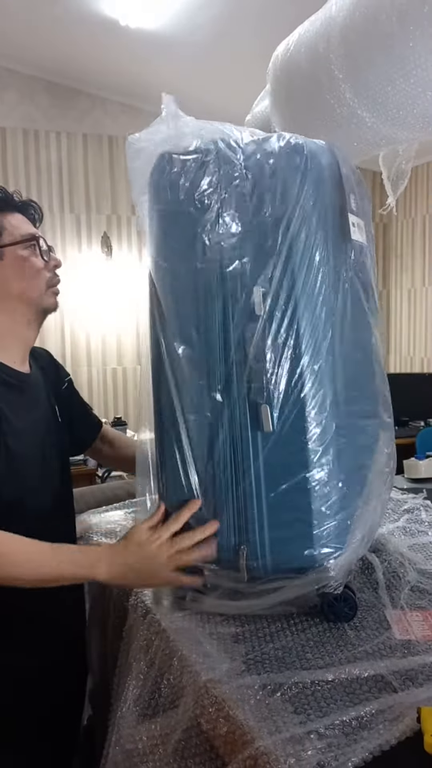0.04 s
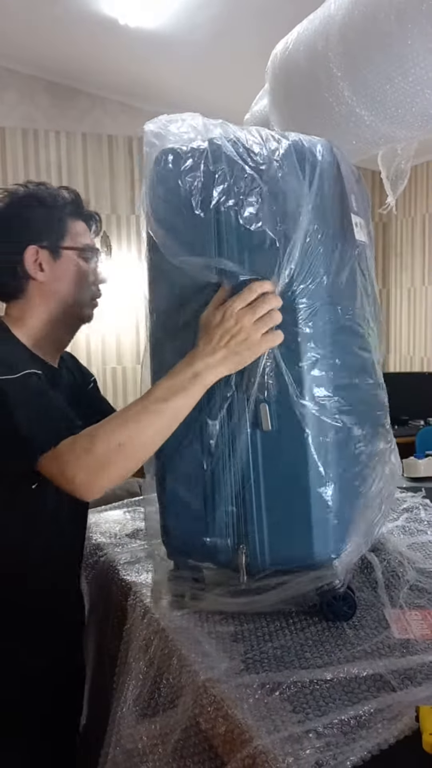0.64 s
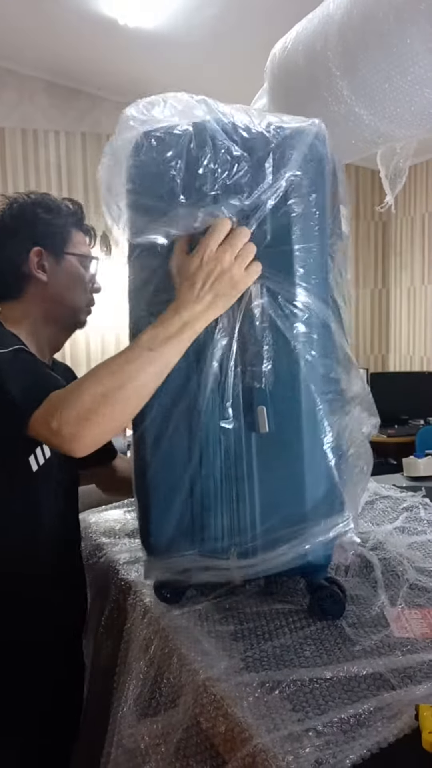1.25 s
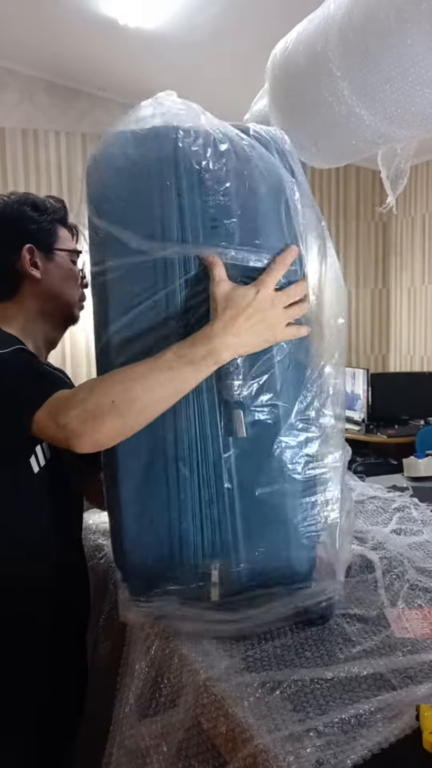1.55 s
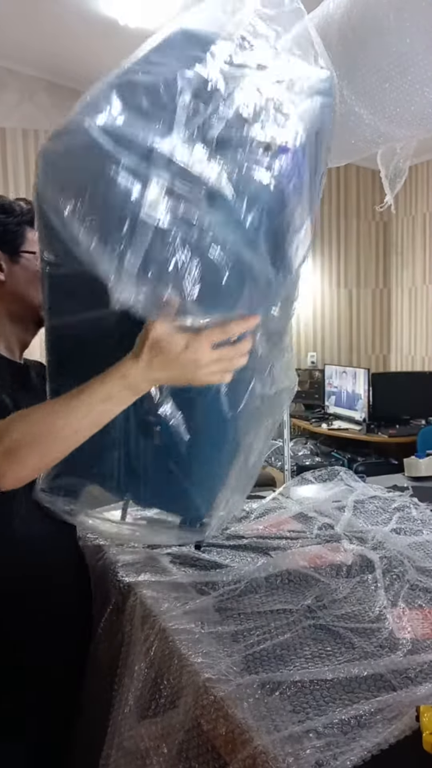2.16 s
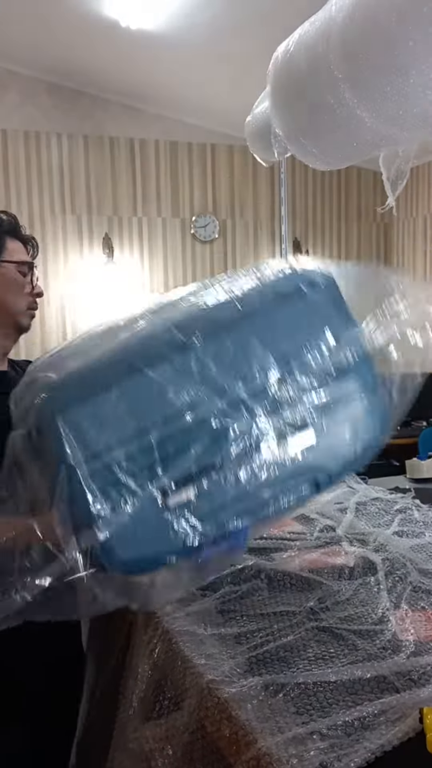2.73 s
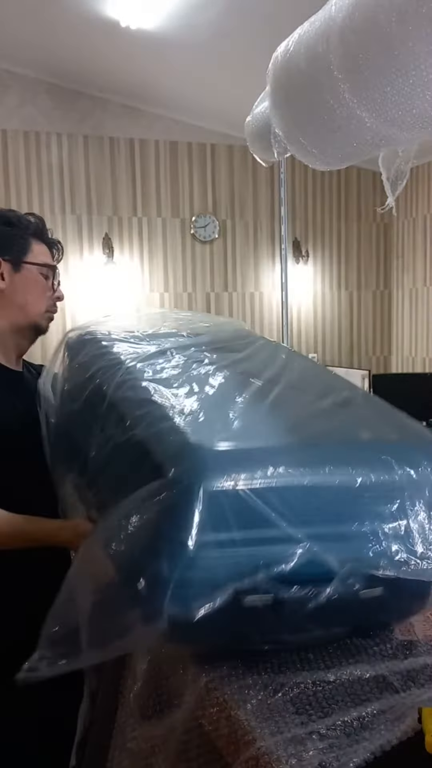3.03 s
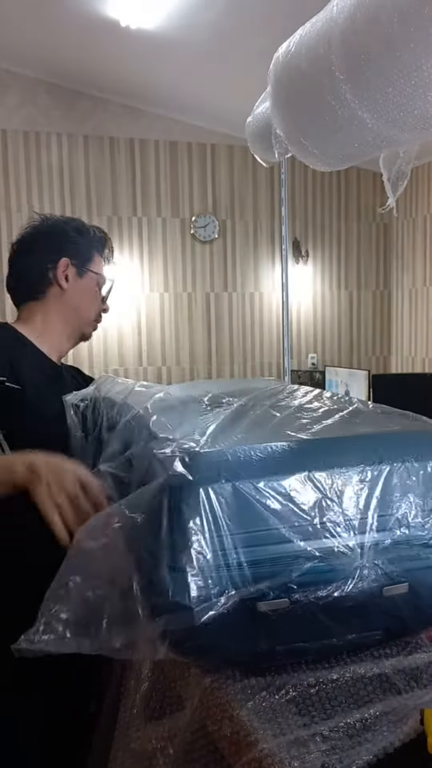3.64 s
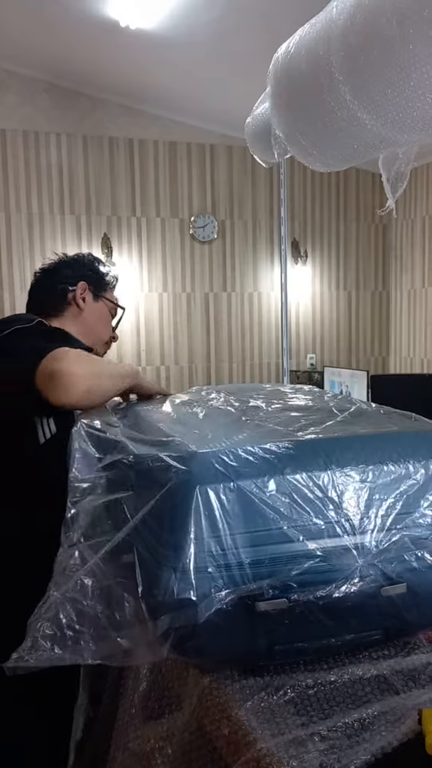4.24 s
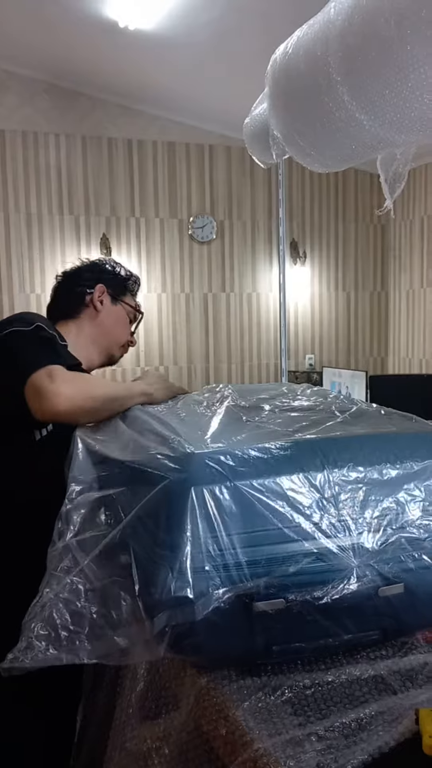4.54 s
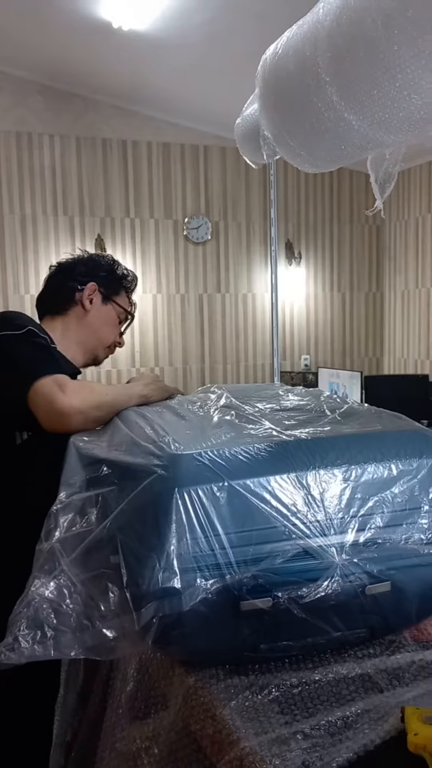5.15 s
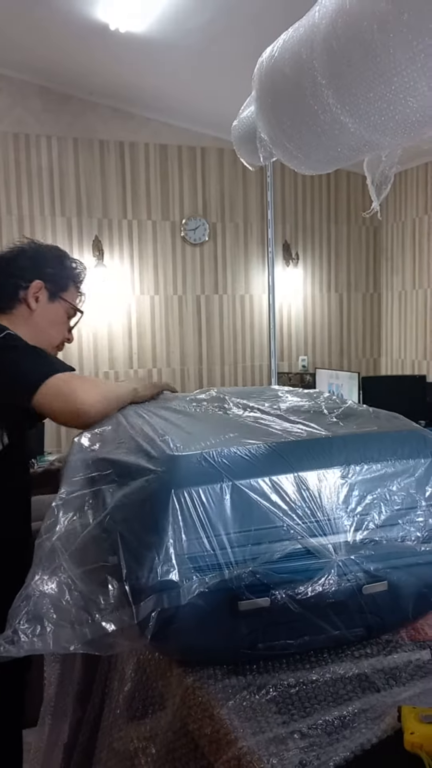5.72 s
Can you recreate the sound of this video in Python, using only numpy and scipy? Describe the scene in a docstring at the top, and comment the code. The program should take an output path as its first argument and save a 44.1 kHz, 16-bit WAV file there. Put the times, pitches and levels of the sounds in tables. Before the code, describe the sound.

From the start, thin plastic film crinkles and rubs over a hard suitcase in short pulls, with light hollow knocks and a faint rumble from the shell. At about 1.3 to 1.5 seconds comes a quick cluster of loud, sharp clacks and knocks from the case and its fittings. Softer rustling continues, with small bumps near 2.1 and 2.7 seconds. At 3 seconds the case lands on a table with a low, hollow boom, then knocks and clacks loudly several times until 3.6 seconds as the crinkling swells again. The film rustles quietly after 4 seconds, with a scuff and knock around 4.8. From about 5.1 to 5.7 seconds a short zip-like buzz rises in pitch and falls, ending with a light knock, a rustle and a small click. Everything sounds close, in a small, quiet room with a short reverberation.

```python
"""Bagged suitcase laid on a table

A hard suitcase in a loose plastic bag is gripped, lifted and laid on its side in a small room.
Each pull crinkles the film and drags it over the hollow shell, which knocks and booms; fittings clack.
At the end a zip-like slider ticks over teeth in a short buzz that rises, then falls."""
import sys
import numpy as np
from scipy import signal
from scipy.fft import rfft, irfft
from scipy.io import wavfile
from scipy.ndimage import uniform_filter1d

SR = 44100
rng = np.random.default_rng(int(sys.argv[2]) if len(sys.argv) > 2 else 0)


def put_to_file(sound):
    """Save the sound as 16-bit audio at rate SR, in the file named by the first command-line argument."""
    columns = np.atleast_2d(sound).T  # one column per channel
    safe = np.clip(columns, -1, 1)
    whole_steps = np.round(safe * 32767)
    wavfile.write(sys.argv[1], SR, whole_steps.astype(np.int16))


N = 255185
TIME_S = np.arange(N) / SR
BINS_HZ = abs(np.fft.fftfreq(4096, 1 / SR))
PORT_GAP_S = 0.000476  # sound travel between the microphone's two ports


def amp(db):
    """Decibels to gain."""
    return 10 ** (np.asarray(db) / 20)


def unit(x):
    """Scale to rms 1."""
    return x / np.sqrt(np.mean(x ** 2) + 1e-20)


def spectrum(points, hz=BINS_HZ):
    """Interpolate a table over log frequency."""
    point_hz, value = np.transpose(points)
    return np.interp(np.log(hz + 1), np.log(point_hz), value)


def curves(rows):
    """Interpolate a table over time, per column and sample."""
    time_s, *columns = np.transpose(rows)
    return [np.interp(TIME_S, time_s, column) for column in columns]


def wander(hz):
    """Random drift up to hz, rms 1."""
    return unit(signal.sosfilt(signal.butter(2, hz, fs=SR, output="sos"), rng.standard_normal(N)))


def add(mix, start_s, sound):
    """Mix a sound in at start_s."""
    part = mix[max(round(start_s * SR), 0):][:len(sound)]
    part += sound[:len(part)]


def convolve(x, response):
    """Convolve along time, keeping the length."""
    return signal.fftconvolve(np.atleast_2d(x), np.atleast_2d(response), axes=1)[:, :x.shape[-1]]


def causal(db):
    """Minimum-phase response shaped by db over BINS_HZ, energy 1."""
    log_gain = np.conj(signal.hilbert(np.log(amp(db))))
    response = np.fft.ifft(np.exp(log_gain)).real[:len(BINS_HZ) // 2]
    return response / np.linalg.norm(response)


def diffuse(pair, bass_coherence=0.92):
    """Sound from all sides: alike at both ports in the bass, unrelated in the treble."""
    coherence = bass_coherence * np.sinc(2 * np.fft.rfftfreq(pair.shape[1], 1 / SR) * PORT_GAP_S)
    mid, side = rfft(pair) * np.sqrt([(1 + coherence) / 2, (1 - coherence) / 2])
    return irfft([mid + side, mid - side], pair.shape[1])


def direct(x, lag_s):
    """A near source reaches the right port first; table and case echo it."""
    # (delay [s], level [dB])
    echoes = [(.0033, -24), (0.0131, -12.5)]
    hz = np.fft.rfftfreq(N, 1 / SR)
    paths = 1 + sum(amp(db - 6 / (1 + hz / 500)) * np.exp(-2j * np.pi * hz * s) for s, db in echoes)
    port_lag = np.array([np.exp(-2j * np.pi * hz * lag_s), np.ones(len(hz))])
    return irfft(rfft(x) * paths * port_lag, N)


def room(x, build_s=0.0053):
    """A diffuse tail builds quickly and dies band by band."""
    # (frequency [Hz], T60 [s])
    reverb_times = [(100, 0.11), (400, 0.39), (1000, 0.33), (3000, 0.42), (6000, 0.4), (10000, 0.37),
                    (16000, 0.26)]
    hz, t, bands = signal.stft(rng.standard_normal((2, SR // 2)), SR, nperseg=256)
    decay = amp(-60 * t / spectrum(reverb_times, hz)[:, None])
    tail = signal.istft(bands * decay, SR, nperseg=256)[1]
    build = 1 - np.exp(-(np.arange(tail.shape[1]) / SR / build_s) ** 2)
    tail = diffuse(tail) * build
    return convolve(x, tail / np.linalg.norm(tail[0]))


def pull_levels(swell_db=9):
    """Each pull swells, holds and settles: crinkle, rubbing and rumble levels in dB."""
    # (start [s], rise [s], hold [s], crinkle [dB], rubbing [dB], rumble [dB])
    pulls = [(-.02, 0.017, 0.11, -41, -40.5, -60), (0.093, 0.029, 0.054, -39, -37, -40.5),
             (0.482, 0.019, 0.069, -42, -41.5, -56), (0.588, 0.024, 0.082, -48, -57, -47.5),
             (0.766, 0.042, 0.1, -46.5, -43, -50.5), (0.976, 0.057, 0.077, -41, -35, -49),
             (1.183, 0.036, 0.12, -55, -62, -62), (1.311, 0.064, 0.19, -44, -39, -42),
             (1.623, 0.035, 0.11, -54, -54, -55.5), (1.815, 0.09, 0.1, -54, -49.5, -63),
             (2.022, 0.032, 0.24, -60, -50.5, -57.5), (2.27, 0.087, 0.77, -56.5, -56.5, -67),
             (2.607, 0.022, .07, -60, -51.5, -77), (2.841, 0.16, 0.01, -48, -45.5, -56),
             (3.145, 0.029, 0.34, -46.5, -39.5, -44.5), (3.533, 0.04, 0.074, -41.5, -37, -52),
             (3.738, 0.027, 0.005, -41, -43, -58), (4.019, 0.012, 0.13, -52.5, -61, -73),
             (4.268, 0.073, 0.35, -61, -56.5, -64.5), (4.443, 0.041, 0.039, -61.5, -53, -68),
             (4.784, 0.028, 0.076, -54.5, -39, -74), (4.846, 0.013, 0.017, -50, -55, -76),
             (4.893, 0.028, .12, -62, -78, -58.5), (5.167, 0.047, 0.036, -61, -46.5, -58),
             (5.3, 0.049, 0.29, -60.5, -45, -54), (5.701, 0.039, 0.024, -53, -50, -49.5)]
    # fall after a pull (crinkle [dB/s], rubbing [dB/s], rumble [dB/s])
    settle_db_per_s = (161.5, 182.5, 116)
    t, power = np.arange(0, N / SR + 0.002, 0.001), 0
    for start_s, rise_s, hold_s, *levels_db in pulls:
        held_s = t - start_s - rise_s
        rise_db = swell_db * np.minimum(held_s / rise_s, 0)
        fall_db = np.outer(settle_db_per_s, np.maximum(held_s - hold_s, 0))
        power = power + amp(np.array(levels_db)[:, None] + rise_db - fall_db) ** 2
    return [np.interp(TIME_S, t, 10 * np.log10(p + 1e-12)) for p in power]


def creases(per_s=1300, spread_db=1.5, pitches=24):
    """Tiny buckles of the film tick, each pitch from its own place; most weak, a few sharp."""
    out, t = np.zeros((2, N)), np.arange(160) / SR
    for hz in np.geomspace(900, 15000, pitches):
        size = amp(spread_db * np.minimum(rng.exponential(1, N), 4))
        snaps = rng.random(N) < per_s / pitches / SR
        age_s = np.maximum(t - PORT_GAP_S * np.array([[rng.random()], [0.25]]), 0)
        tick = np.sin(2 * np.pi * hz * age_s) * np.exp(-age_s * hz / 0.25)
        out += convolve(size * snaps, unit(tick) * np.sqrt(hz))
    return unit(out)


def film(pull_db, gain_db=3.5, clump_db=1.37, clump_hz=35, tick_db=-3, wet_db=3, slide_db=-4):
    """Creases snap in clumps over the hiss of film on film; a taut sheet sounds brighter."""
    # (frequency [Hz], level [dB])
    crinkle_spectrum = [(200, -15.5), (700, -6), (1500, -1), (2800, 0.5), (5500, 2), (7000, -0.5),
                        (8300, -7.5), (12000, -2), (15500, -4)]
    # treble above 8 kHz (time [s], relative level [dB])
    fizz = [(0, -1.5), (0.5, -5), (1.7, 0), (2.25, -0.5), (3, -1.5), (4.1, -5), (4.5, 0.5), (4.9, -7),
            (5.75, 2)]
    level_db = pull_db + gain_db + clump_db * wander(clump_hz)
    ticks = creases()
    crackle = amp(tick_db) * (ticks + amp(wet_db) * room(ticks))
    slide = amp(slide_db) * diffuse(rng.standard_normal((2, N)))
    sheet = unit(convolve(crackle + slide, causal(spectrum(crinkle_spectrum))))
    treble = signal.sosfiltfilt(signal.butter(2, 8000, "high", fs=SR, output="sos"), sheet)
    fizz_db = curves(fizz)[0] + 6
    return amp(level_db) * (sheet - treble + treble * amp(fizz_db))


def friction(colour, catch_hz, catch_db=2.5):
    """Noise of surfaces that catch and slip unevenly, rms 1."""
    grip = amp(catch_db * wander(catch_hz))
    drive = diffuse(rng.standard_normal((2, N))) * grip
    return unit(convolve(drive, causal(spectrum(colour))))


def rubbing(pull_db, gain_db=-5.5):
    """Hands and film drag over the shell."""
    # (frequency [Hz], level [dB])
    rub_spectrum = [(100, -9), (250, 0.5), (500, -1), (900, -4), (1500, -2.5), (3000, -37), (8000, -44.5)]
    return amp(pull_db + gain_db) * friction(rub_spectrum, catch_hz=70)


def rumble(pull_db, air_db=-72):
    """The dragged shell rumbles over the faint, steady rumble of the room's air."""
    # shell and air alike (frequency [Hz], level [dB])
    rumble_spectrum = [(20, -35), (45, -21.5), (65, -7.5), (105, 3.5), (135, -9), (165, -10), (260, -6),
                       (500, -39), (2000, -40.5)]
    shell = friction(rumble_spectrum, catch_hz=12)
    air = unit(convolve(diffuse(rng.standard_normal((2, N))), causal(spectrum(rumble_spectrum))))
    return amp(pull_db) * shell + amp(air_db) * air


def hiss(level_db=-73):
    """The microphone's own noise."""
    return amp(level_db) * rng.standard_normal((2, N))


def chatter(decay_s, passes=2):
    """Dying micro-contacts, flat in spectrum, energy 1."""
    t = np.arange(SR // 3) / SR
    fade = amp(-30 * t / decay_s)
    x = rng.standard_normal(len(t)) * fade
    for _ in range(passes):  # fade, then whiten
        x = irfft(np.exp(1j * np.angle(rfft(x * fade))), len(t))
    x = x[:len(t) // 2]
    return x / np.linalg.norm(x)


def clacks(gain_db=5, scatter=0.9, turn_hz=1.7):
    """Hard plastic fittings strike: brief chatter, scattered differently to each port."""
    # (time [s], level [dB], ring scale [s], room send [dB])
    strikes = [(0.067, -29, 0.0018, 6), (1.283, -0.5, 0.011, -8.5), (1.373, -3.5, 0.01, -3.5),
               (1.3946, -2.5, 0.034, -10), (1.4452, 4, 0.013, -6), (1.4781, -1, 0.003, -13),
               (1.4799, 2.5, 0.0077, -20), (1.4866, 1, 0.014, -2), (1.987, -24.5, 0.013, 5),
               (2.593, -23, 0.02, 0), (2.6675, -39.5, 0.0068, 18), (3.0403, 2.5, 0.0046, 1.5),
               (3.2213, -1.5, 0.0038, -0.5), (3.2290, -3, 0.0047, 7), (3.447, -9, 0.023, 8),
               (3.5300, -7, 0.027, 2), (3.757, -28, .01, -8), (4.845, -27, 0.0078, -7),
               (5.7407, -23, .01, -22)]
    # (frequency [Hz], level [dB])
    clack_spectrum = [(60, -31), (300, -16), (900, -9), (1700, -1.5), (3000, 4), (5700, 3.5), (7300, -2.5),
                      (8500, -7.5), (12000, -4.5), (15500, -9.5)]
    # left, right (frequency [Hz], width [Hz], peak [dB])
    port_resonances = [(7300, 910, 7), (3800, 700, 1)]
    near, far = np.zeros((2, N)), np.zeros(N)
    colour = causal(spectrum(clack_spectrum))
    for start_s, db, ring_s, room_db in strikes:
        contact = chatter(max(ring_s * 2, 0.009), passes=3)
        for port in near:
            arrival = (contact + scatter * chatter(ring_s * 3)) / np.hypot(1, scatter)
            add(port, start_s, amp(db + gain_db) * signal.fftconvolve(arrival, colour))
        add(far, start_s, amp(db + gain_db + room_db) * colour)
    ports = [causal(db / (1 + ((BINS_HZ - hz) / (width_hz / 2)) ** 2))
             for hz, width_hz, db in port_resonances]
    # the case moves, so the room answers each clack differently
    turn_rad = 2 * np.pi * turn_hz * TIME_S
    reverb = room(far * np.cos(turn_rad)) + room(far * np.sin(turn_rad))
    return convolve(direct(near, lag_s=0.00012), ports) + reverb


def knocks(focus_db_per_oct=6, dull_db_per_oct=8, ring_cycles=1.2, wet_db=-4):
    """Short blows ring a damped panel and sound round; long scuffs mostly chatter."""
    # (time [s], level [dB], centre [Hz], decay scale [s])
    blows = [(.112, -8, 684, 0.069), (0.5004, -13, 840, 0.048), (0.631, -14.5, 280, 0.15),
             (1.046, -7, 1120, 0.025), (1.09, -10.5, 300, 0.092), (1.364, -2.5, 610, 0.073),
             (1.389, -4.5, 600, 0.046), (1.465, 0.5, 1000, 0.025), (1.474, -0.5, 272, 0.12),
             (1.536, -13, 296, 0.17), (2.061, -6, 307, 0.033), (2.083, -9.5, 464, 0.018),
             (2.665, -11, 1005, 0.051), (3.038, 2, 510, 0.088), (3.057, 5, 297, 0.12),
             (3.100, -2, 267, 0.064), (3.223, -3, 252, 0.13), (3.437, 3, 770, 0.045),
             (3.444, 6, 336, 0.047), (3.532, 3, 870, 0.02), (3.534, 5.5, 376, 0.033),
             (3.579, -2, 573, 0.05), (3.611, -7, 397, 0.0534), (3.792, -13.5, 705, 0.051),
             (4.297, -27, 378, 0.035), (4.328, -22.5, 397, 0.021), (4.55, -27.5, 1200, 0.062),
             (4.778, -9, 650, 0.32), (4.844, -3.5, 815, 0.074), (5.594, -10.5, 600, 0.077)]
    # (frequency [Hz], level [dB])
    knock_spectrum = [(40, -36), (150, 1), (240, 3), (315, 0), (420, -1), (600, 0), (830, 0), (1100, 1.5),
                      (1500, 3.5), (2300, 4.5), (4000, 2.5), (6000, -21), (15000, -40.5)]
    out, t = np.zeros(N), np.arange(SR // 6) / SR
    for start_s, db, hz, decay_s in blows:
        octaves = np.log2((BINS_HZ + 20) / hz)
        roundness = 1 / (1 + (decay_s / 0.055) ** 2)
        focus_db = focus_db_per_oct * np.hypot(0.5, octaves)
        dull_db = dull_db_per_oct * roundness * np.clip(octaves, 0, 2)
        colour = causal(spectrum(knock_spectrum) - focus_db - dull_db)
        attack = 1 - np.exp(-t * hz)
        contact = signal.fftconvolve(chatter(decay_s * 2)[:len(t)] * attack, colour)[:len(t)]
        ring = np.sin(2 * np.pi * hz * t) * np.exp(-t * hz / ring_cycles) * attack
        add(out, start_s, amp(db) * (contact + roundness * ring / np.linalg.norm(ring)))
    return direct(out, lag_s=0.00013) + amp(wet_db) * room(out)


def booms(gain_db=-1, t60_s=0.32, detune=0.022, port_phase_rad=0.23, pan_db=0.7):
    """Slow pushes swell the low modes of the hollow case."""
    # (time [s], level [dB], swell [s], upper modes [dB])
    pushes = [(.115, -31.5, 0.064, 0), (0.515, -27.5, 0.032, -14), (.814, -32, 0.022, -7),
              (1.071, -33.5, 0.035, -11), (1.384, -28, 0.035, 7.5), (1.469, -29.5, 0.013, 8),
              (1.55, -38, 0.018, 7.5), (2.071, -40.5, 0.014, -16), (3.046, -15, 0.0076, 0.5),
              (3.098, -19, 0.024, -4), (3.251, -39, 0.022, 10), (3.441, -26.5, 0.042, -3),
              (5.378, -44, 0.021, 11), (5.47, -46, 0.024, 10.5)]
    # (frequency [Hz], level [dB], share of t60_s [ratio])
    shell_modes = [(82, -16.5, 1), (105.6, 2.5, 0.82), (160.9, -6.5, 0.78), (212, -30.5, 0.75),
                   (280.4, -13, 0.56)]
    out, t = np.zeros(N), np.arange(SR * 3 // 4) / SR
    for start_s, db, swell_s, upper_db in pushes:
        swell = np.sin(np.pi / 2 * np.minimum(t / swell_s, 1)) ** 2
        for k, (hz, mode_db, share) in enumerate(shell_modes):
            peak_db = db + gain_db + mode_db + upper_db * (k > 1)
            fall_db = 60 * np.maximum(t - swell_s, 0) / (t60_s * share)
            tone = np.sin(2 * np.pi * hz * (1 + detune * rng.standard_normal()) * t)
            add(out, start_s, swell * amp(peak_db - fall_db) * tone)
    # standing waves in the room put the ports out of step
    shift = np.exp(0.5j * port_phase_rad * np.array([[-1], [1]]))
    return (signal.hilbert(out) * shift).real * amp([[pan_db], [-pan_db]])


def zipper(catch_hz=749, roughness=0.43, snag_db=6, snag_hz=17.27, speed_drift=0.02037, wet_db=-6):
    """Tooth ticks merge into a tone at even speed; below catch_hz the slider catches and rasps."""
    # (time [s], tooth rate [Hz], level [dB])
    stroke = [(5.13, 234, -63.5), (5.19, 280, -55), (5.34, 430, -46.5), (5.362, 680, -46.5),
              (5.45, 900, -48), (5.485, 824, -45.5), (5.545, 815, -37.5), (5.588, 760, -43.5),
              (5.603, 510, -53), (5.68, 270, -67)]
    # (frequency [Hz], level [dB])
    body_spectrum = [(100, -6), (300, 0.5), (600, 2), (820, -2), (1100, 0.5), (1650, -5.5), (2200, -15),
                     (3300, -11.5), (6000, -22), (15000, -50)]
    tooth_hz, level_db = curves(stroke)
    snag = amp(snag_db * wander(snag_hz))
    rough = np.clip(roughness * snag / (1 + (tooth_hz / catch_hz) ** 12), 0.15, 0.7)
    jitter, catch = unit(uniform_filter1d(rng.standard_normal((2, N)), size=170))
    speed = 1 + 0.24 * rough * jitter + speed_drift * wander(snag_hz)
    teeth_passed = np.cumsum(tooth_hz * speed) / SR
    tone = unit(sum(np.cos(2 * np.pi * k * teeth_passed) / (1 + (k / 2.3) ** 2) for k in range(1, 12)))
    ticks = tone * amp(9 * rough * catch)
    scrape = unit(np.exp(-2 * (teeth_passed % 1)) * rng.standard_normal(N))
    buzz = convolve((1 - rough) * ticks + rough * scrape, causal(spectrum(body_spectrum)))[0]
    running_rms = np.sqrt(uniform_filter1d(buzz ** 2, size=900) + 1e-9)
    moving = (TIME_S > stroke[0][0]) * (TIME_S < stroke[-1][0])
    buzz *= moving * amp(level_db) / snag ** 0.42 / running_rms
    return buzz + amp(wet_db) * room(buzz)


def scene():
    """Film, case and zip in a quiet room."""
    crinkle_db, rub_db, rumble_db = pull_levels()
    handling = film(crinkle_db) + rubbing(rub_db) + rumble(rumble_db)
    return handling + hiss() + clacks() + knocks() + booms() + zipper()


def record(dry, low_cut_hz=42, band_limit_hz=15950):
    """Microphone bass roll-off, full-scale clipping, band limit."""
    heard = signal.sosfilt(signal.butter(2, low_cut_hz, "high", fs=SR, output="sos"), dry)
    lowpass = signal.firwin(255, band_limit_hz, window=("kaiser", 9), fs=SR)
    return signal.oaconvolve(np.clip(heard, -1, 1), lowpass[None], "same")


dry = scene()
out = record(dry)
put_to_file(out)
```